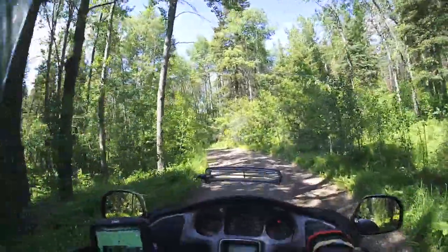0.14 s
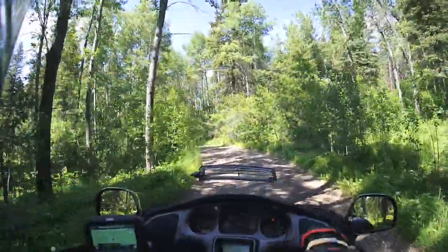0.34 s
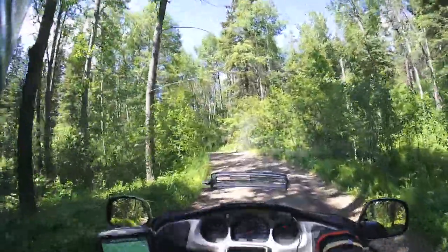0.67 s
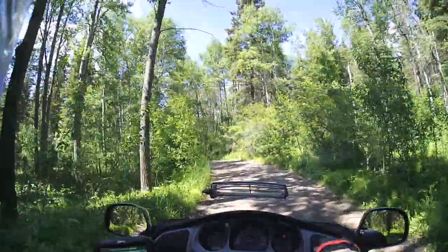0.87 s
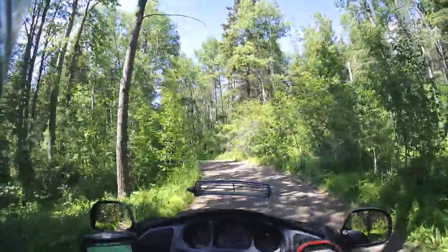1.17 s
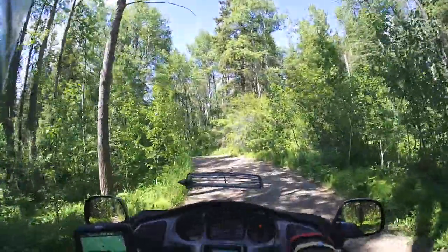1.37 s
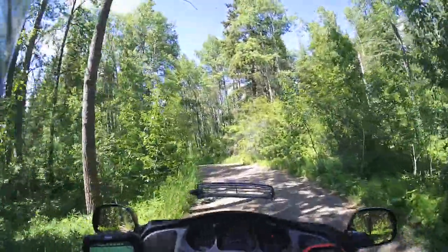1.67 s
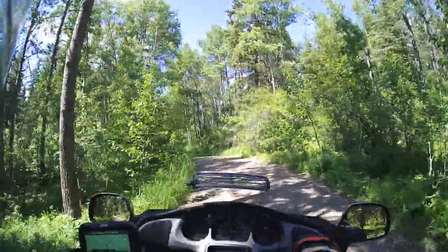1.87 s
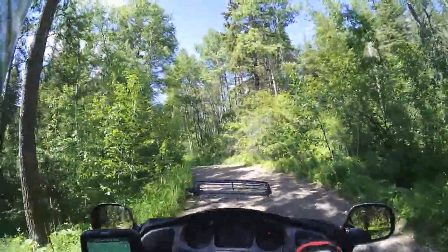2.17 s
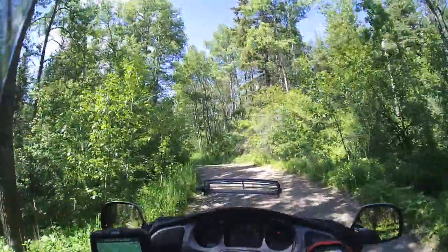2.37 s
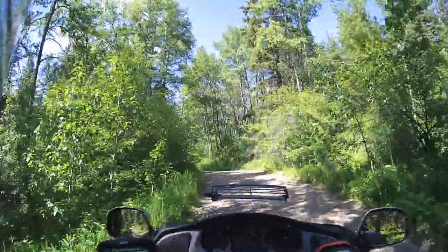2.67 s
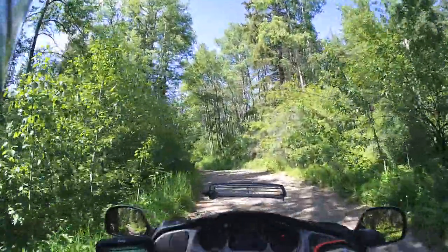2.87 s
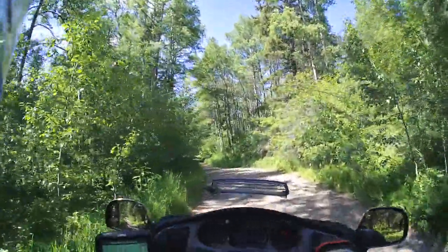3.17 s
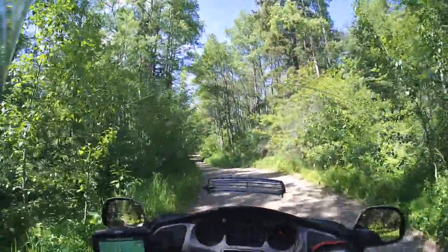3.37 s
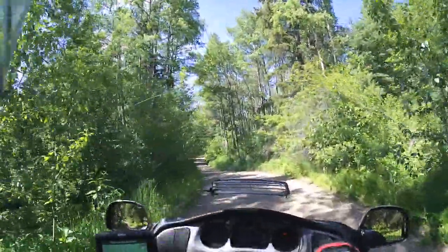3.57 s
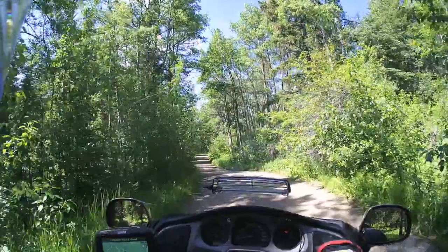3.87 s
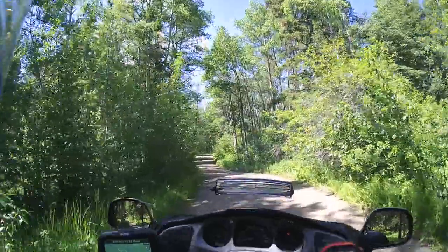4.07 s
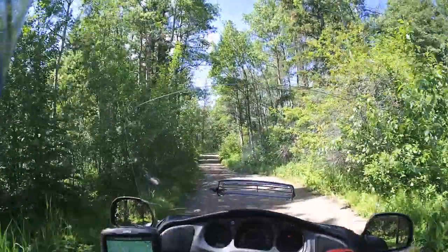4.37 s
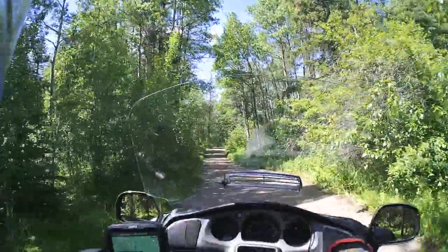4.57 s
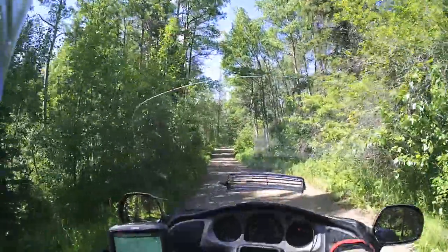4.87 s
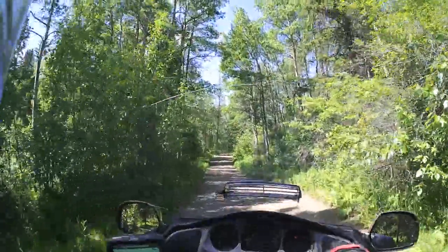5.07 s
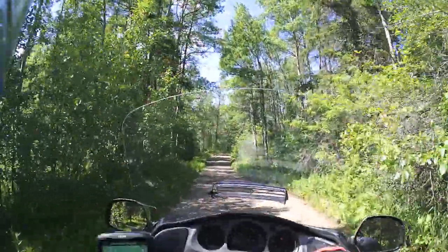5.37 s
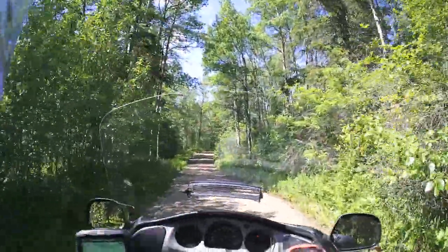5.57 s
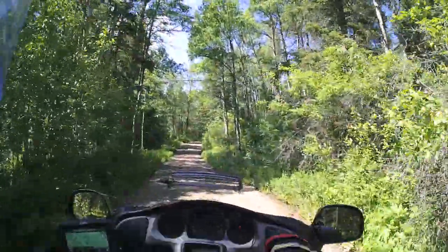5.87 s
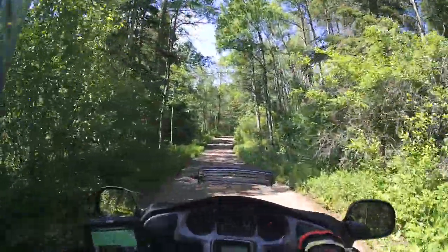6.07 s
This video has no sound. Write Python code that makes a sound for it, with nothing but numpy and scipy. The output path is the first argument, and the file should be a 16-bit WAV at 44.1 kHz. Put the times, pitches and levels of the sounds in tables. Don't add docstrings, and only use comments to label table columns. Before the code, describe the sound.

On a motorcycle rolling along a forest dirt road, a microphone closed in a plastic housing picks up constant soft hiss. A brief hollow rush of air opens, then deep gusts and dull thumps crowd together for two seconds, with one small plastic tick near the first second. After that the wind thins to isolated puffs and thumps. The engine is only a very faint low hum.

```python
import sys
import numpy as np
from scipy import signal
from scipy.fft import rfft, irfft
from scipy.io import wavfile
from scipy.ndimage import uniform_filter1d

SR = 44100
rng = np.random.default_rng(int(sys.argv[2]) if len(sys.argv) > 2 else 0)


def unload_wav(signal):
    wavfile.write(
        sys.argv[1],
        SR,
        np.round(np.clip(np.atleast_2d(signal).T, -1, 1) * 32767).astype(np.int16),
    )


def makeup_ratio(level_db):
    decades = np.asarray(level_db, float) / 20
    return 10 ** decades


N = 274743

# low edge in Hz, high edge in Hz.
EDDY_BANDS = [
    (28, 70),
    (70, 140),
    (140, 250),
    (250, 420),
    (420, 720),
]
LET_GO_DB_PER_S = 232


def rms_one(x):
    return x / np.sqrt(np.mean(x ** 2) + 1e-20)


def band(x, low_hz, high_hz, order=2):
    return signal.sosfilt(signal.butter(order, [low_hz, high_hz], "band", fs=SR, output="sos"), x)


def resonance(x, hz, width_hz):
    r = np.exp(-np.pi * width_hz / SR)
    gain = (1 - r * r) / 2
    return signal.lfilter([gain, 0, -gain], [1, -2 * r * np.cos(2 * np.pi * hz / SR), r * r], x)


def steady(x, window_s):
    return x / np.sqrt(uniform_filter1d(x ** 2, int(window_s * SR)) + 1e-20)


def hiss(level_db=-44.5, cavity_hz=1316, cavity_width_hz=69, cavity_lift=0.45):
    # frequency in Hz, density in dB per Hz.
    colour_points = [(20, -7), (50, -20.5), (170, -14.5), (280, -9.5), (650, -4.5), (1800, -1), (9000, -2),
                     (14000, -9)]
    point_hz, point_db = np.transpose(colour_points)
    hz = np.maximum(np.fft.rfftfreq(N, 1 / SR), 1)
    colour = makeup_ratio(np.interp(np.log(hz), np.log(point_hz), point_db))
    noise = irfft(rfft(rng.standard_normal(N)) * colour * (hz < 12000), N)
    ring = cavity_lift * resonance(noise, cavity_hz, cavity_width_hz)
    return makeup_ratio(level_db) * rms_one(noise + ring)


def engine_hum():
    # frequency in Hz, level in dB rms.
    orders = [
        (80.7, -81),
        (113.0, -78),
    ]
    hum = np.zeros(N)
    for hz, db in orders:
        waver = resonance(rng.standard_normal(2 * N), hz, 1.5)[N:]
        hum += makeup_ratio(db) * rms_one(waver)
    return hum


def tick(rise_s=0.00055):
    # start in seconds, peak in dB.
    strikes = [
        (0.91, -31.5),
    ]
    # frequency in Hz, level in dB, 60 dB decay time in seconds.
    shell_modes = [(1134, 1, 0.026), (1330, 0, 0.016), (1480, -12, .03), (880, -14, .02)]
    (start_s, peak_db), = strikes
    t = np.maximum(np.arange(N) / SR - start_s, 0)
    rings = np.zeros(N)
    for hz, db, t60 in shell_modes:
        rings += makeup_ratio(peak_db + db - 60 * t / t60) * np.sin(2 * np.pi * hz * t)
    return rings * (1 - np.exp(-t / rise_s))


def rush(level_db=-45.5, peak_s=0.14, end_s=0.36, rise_db_per_s=144, fall_db_per_s=51):
    # frequency in Hz, width in Hz, level in dB.
    cavity_modes = [(1435, 130, -3.5), (1270, 41, -11), (2060, 200, -12), (255, 39, 2)]
    air = rng.standard_normal(N)
    rings = np.zeros(N)
    for hz, width_hz, db in cavity_modes:
        once = resonance(air, hz, 1.5 * width_hz)
        rings += makeup_ratio(db) * resonance(once, hz, 1.5 * width_hz)
    t = np.arange(N) / SR
    fade_db = rise_db_per_s * np.maximum(peak_s - t, 0)
    fade_db += fall_db_per_s * np.maximum(t - peak_s, 0)
    fade_db += LET_GO_DB_PER_S * np.maximum(t - end_s, 0)
    return makeup_ratio(level_db - fade_db) * rms_one(rings)


def thumps(cycles=0.89, trim_db=-5):
    # middle in seconds, peak in dB, swing in Hz.
    strong_eddies = [(0.278, -27, 157), (0.312, -26, 108), (0.353, -33, 144), (0.436, -22, 138),
                     (0.59, -33, 134), (0.622, -30, 158), (0.659, -21.5, 217), (0.679, -35, 83),
                     (0.808, -32, 105), (6.222, -42, 65), (0.996, -25, 200), (1.044, -24.5, 138),
                     (1.164, -36, 71), (1.292, -29, 144), (1.315, -28.5, 128), (1.398, -34, 125),
                     (1.669, -35, 162), (1.761, -39, 164), (1.817, -32.5, 111), (1.997, -28, 172),
                     (2.153, -44, 107), (2.656, -35, 102), (4.223, -28, 182), (4.257, -42, 93),
                     (4.778, -34, 101), (4.9, -38, 89), (5.198, -38, 85), (5.328, -34.5, 126),
                     (5.591, -36.5, 72), (6.023, -33, 124)]
    half = 1500
    t = np.arange(-half, half) / SR
    out = np.zeros(N + 2 * half)
    for middle_s, peak_db, hz in strong_eddies:
        turn = rng.random()
        swing = np.exp(-2 * (t * hz / cycles) ** 2) * np.cos(2 * np.pi * (hz * t + turn))
        at = round(middle_s * SR)
        out[at:at + 2 * half] += makeup_ratio(peak_db + trim_db) * (swing - swing.mean())
    return out[half:N + half]


def puff_gains(seize_db_per_s=330, rounding_db_per_s2=6000, pivot_hz=130, mean_puff_db=-45):
    # middle in seconds, hold in seconds, level in dB, fineness in dB per octave.
    puffs = [(0.157, 0.029, -40, 1.5), (0.303, 0.21, -41, -0.5), (0.465, 0.1, -35.5, 1.5),
             (0.647, .15, -37, 1.5), (0.835, .16, -35.5, 1), (1.015, 0.081, -38, 0.5),
             (1.13, 0.07, -42.5, 2), (1.341, 0.13, -40, -1), (1.532, 0.044, -47, -1.5),
             (1.656, 0.081, -51, -2), (1.784, 0.082, -44.5, 0), (1.993, 0.029, -41, -0.5),
             (2.161, .02, -50, -2), (2.456, 0.018, -55.5, -6), (2.55, 0.017, -46.5, -1.5),
             (2.596, .04, -70, -4), (2.675, 0.026, -54.5, 0), (2.872, 0.051, -54.5, -0.5),
             (4.135, 0.082, -48.5, -2), (4.226, 0.058, -39.5, -1), (4.322, 0.094, -57.5, -1.5),
             (4.538, 0.043, -49.5, -1.5), (4.779, 0.061, -50.5, -2), (4.887, 0.032, -51, -3),
             (4.977, .08, -71, -4), (5.2, 0.017, -49.5, -0.5), (5.298, 0.08, -49.5, -1.5),
             (5.598, 0.023, -50, 0.5), (6.039, 0.017, -39, -0.5), (6.225, .02, -54, -6)]
    eddy_shares = [-7, -4.5, -5, -13, -18]
    strength_shifts = [-0.11, 0.055, .2, 0.037, -.05]
    size_hold, size_let_go = 0.098, 0.25
    t = np.arange(0, N + 64, 64) / SR
    middle, hold, level_db, fineness = np.transpose(puffs)[:, :, None]
    gains = []
    for (low, high), share_db, shift in zip(EDDY_BANDS, eddy_shares, strength_shifts):
        octave = np.log2(np.sqrt(low * high) / pivot_hz)
        half = hold / 2 * 2 ** (-size_hold * octave)
        let_go = LET_GO_DB_PER_S * 2 ** (size_let_go * octave)
        fade_db = seize_db_per_s * np.maximum(middle - half - t, 0)
        fade_db += let_go * np.maximum(t - middle - half, 0)
        fade_db += rounding_db_per_s2 * np.maximum(np.abs(t - middle) - half, 0) ** 2
        top_db = level_db + share_db + fineness * octave + shift * (level_db - mean_puff_db)
        power = np.sum(makeup_ratio(2 * (top_db - fade_db)), axis=0)
        gains.append(np.interp(np.arange(N) / SR, t, np.sqrt(power)))
    return gains


def gusts(eddies_per_s=700.0, spread_db=1.0, window_cycles=3.8, trim_db=-3.0):
    sizes = makeup_ratio(spread_db * np.minimum(rng.exponential(1, N), 4)) * rng.choice([-1, 1], N)
    eddies = sizes * (rng.random(N) < eddies_per_s / SR) + 1e-18
    pressure = np.zeros(N)
    sign = 1
    for gain, (low, high) in zip(puff_gains(), EDDY_BANDS):
        lumps = steady(band(eddies, low, high), 0.033 + window_cycles / high)
        pressure += sign * gain * lumps
        sign = -sign
    return makeup_ratio(trim_db) * band(pressure, 30, 1100)


def top_band(floor_db=-87.5, spurt_db=27.5, shared_lift_db=3.5, spurt_samples=192):
    # start in seconds, end in seconds.
    gaps = [(.14, .18), (.42, .45), (.49, .52), (.77, .85), (1.3, 1.37), (2.04, 2.09), (2.87, 2.92),
            (3.15, 3.18), (3.46, 3.48), (4.09, 4.14), (4.38, 4.45), (4.87, 4.92), (6.01, 6.04)]
    blocks = N // spurt_samples + 1
    chance = uniform_filter1d(rng.random((3, blocks)), size=2)
    shares = [0.19, 0.19, 0.012]
    spurts = chance < np.quantile(chance, shares)[:, None]
    ragged_db = 4 * rng.standard_normal((3, blocks))
    gain = np.repeat(makeup_ratio(floor_db + spurt_db * spurts + ragged_db), spurt_samples, axis=1)[:, :N]
    t = np.arange(N) / SR
    for start, end in gaps:
        gain[:, (t > start) & (t < end)] = 0
    filler = rms_one(band(rng.standard_normal((3, N)), 9500, 10570))
    left, right, both = band(uniform_filter1d(gain, size=48) * filler, 9250, 11630, order=6)
    both = makeup_ratio(shared_lift_db) * both
    return np.array([left + both, right + both])


def splits(length=2048):
    # middle in seconds, low edge in Hz, high edge in Hz, level in dB.
    bursts = [(.31, 8900, 9500, -60), (.565, 4600, 5900, -56), (.982, 5600, 7000, -58),
              (1.911, 4600, 6270, -56), (2.236, 4160, 5300, -57), (2.236, 6200, 8300, -53),
              (2.38, 8900, 9500, -59), (3.49, 4150, 5170, -56), (3.583, 6900, 8300, -56),
              (3.792, 5600, 7600, -56), (4.766, 5270, 6350, -57), (5.138, 5330, 8950, -51)]
    side = np.zeros(N)
    for middle_s, low, high, level_db in bursts:
        noise = rms_one(band(rng.standard_normal(length), low, high, order=8))
        at = round(middle_s * SR) - length // 2
        side[at:at + length] += makeup_ratio(level_db) * np.hanning(length) * noise
    return np.array([side, -side])


def scene():
    mono = hiss() + engine_hum() + tick() + rush() + thumps() + gusts()
    return np.array([mono, mono])


def low_pass(x):
    return signal.sosfilt(signal.butter(12, 11860, fs=SR, output="sos"), x)


def record(dry):
    top_cut = signal.cheby2(16, 75, 10785, fs=SR, output="sos")
    mix = signal.sosfilt(top_cut, dry) + top_band() + splits()
    return low_pass(mix)


dry = scene()
out = record(dry)
unload_wav(out)
```